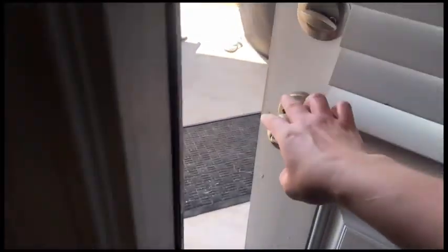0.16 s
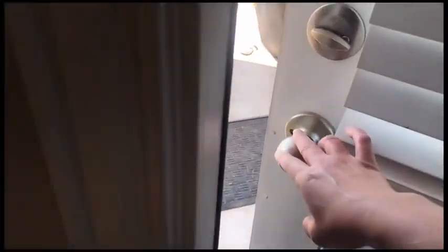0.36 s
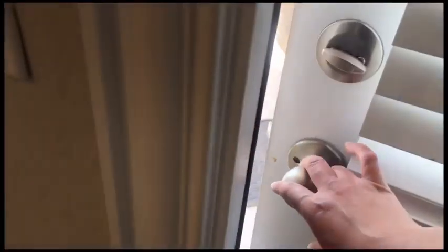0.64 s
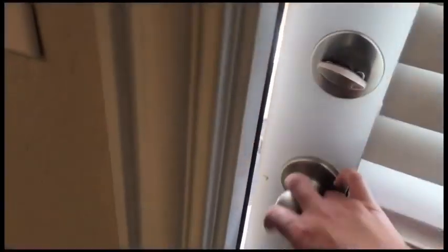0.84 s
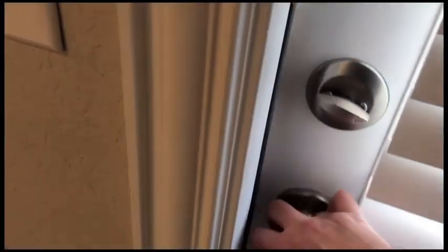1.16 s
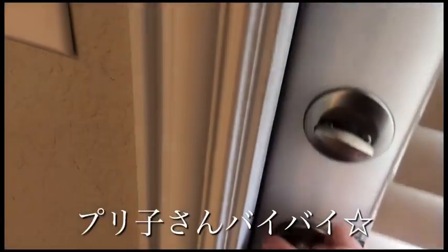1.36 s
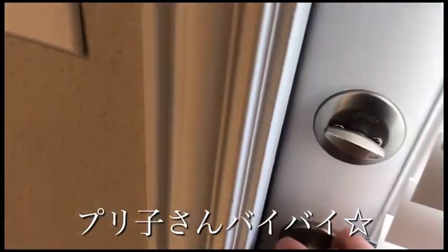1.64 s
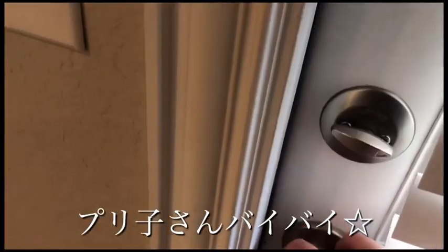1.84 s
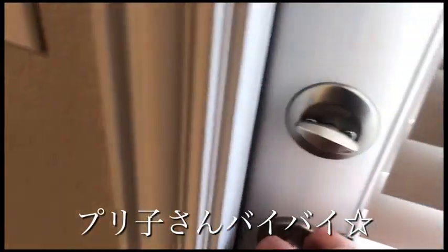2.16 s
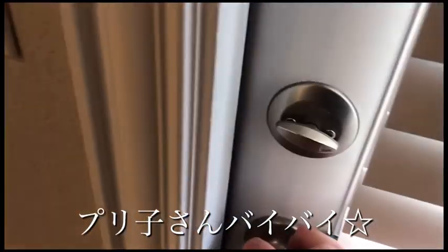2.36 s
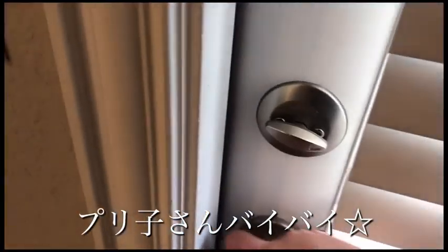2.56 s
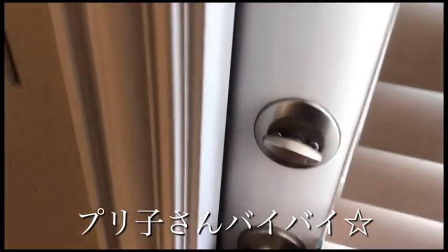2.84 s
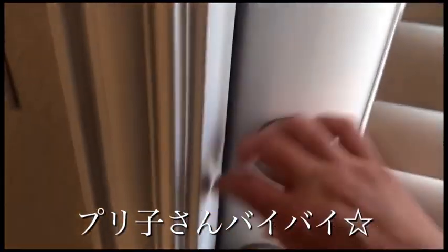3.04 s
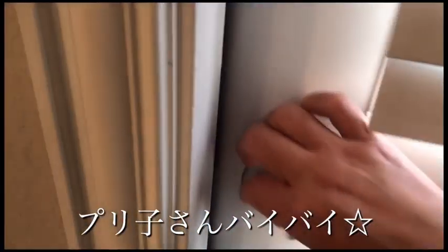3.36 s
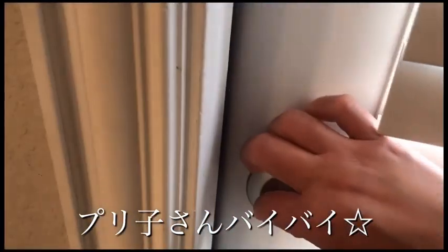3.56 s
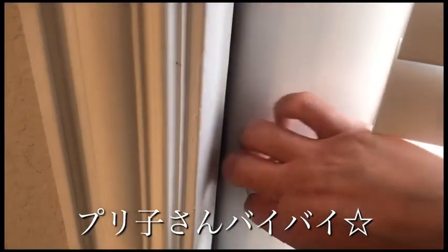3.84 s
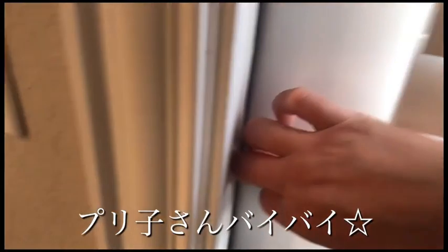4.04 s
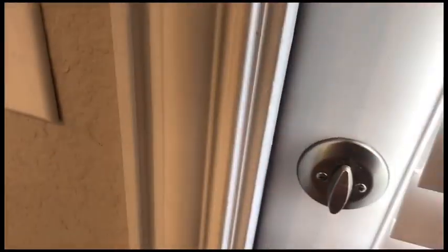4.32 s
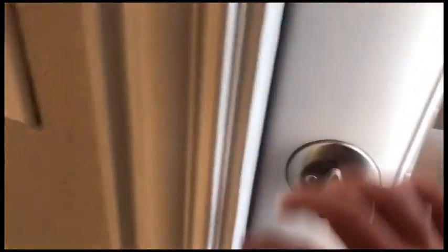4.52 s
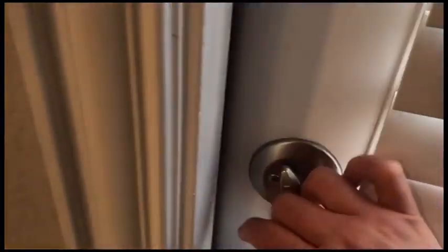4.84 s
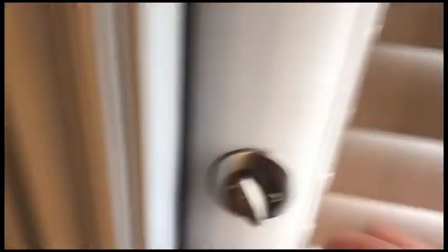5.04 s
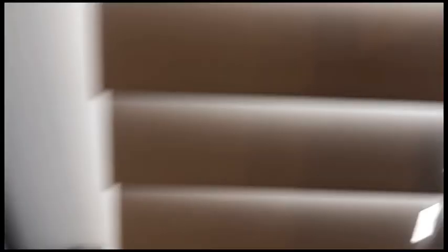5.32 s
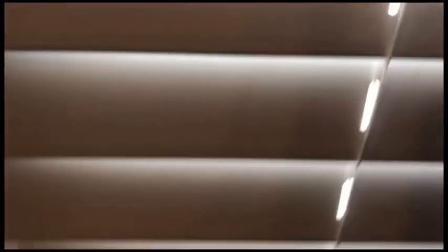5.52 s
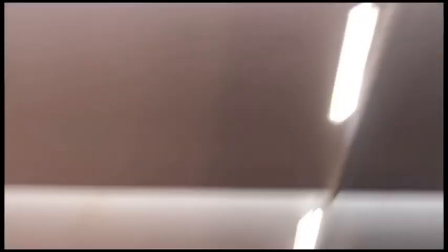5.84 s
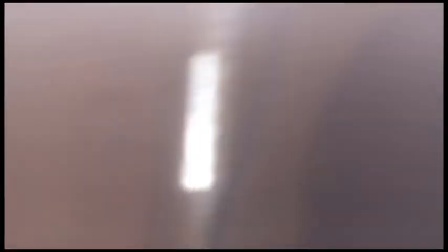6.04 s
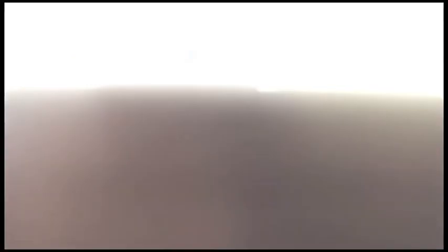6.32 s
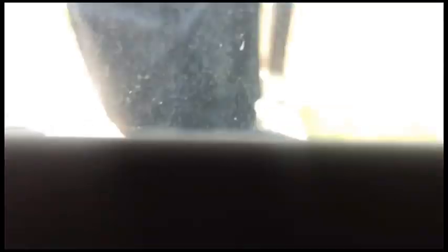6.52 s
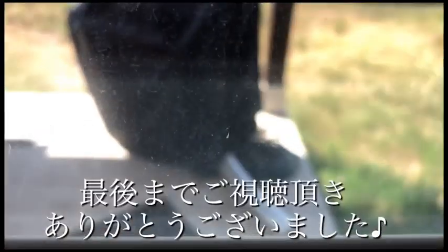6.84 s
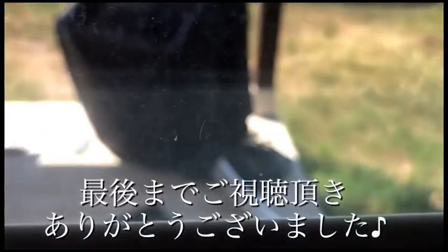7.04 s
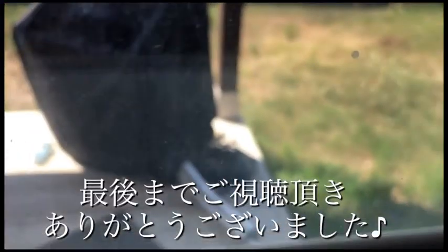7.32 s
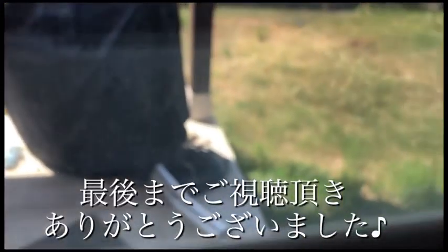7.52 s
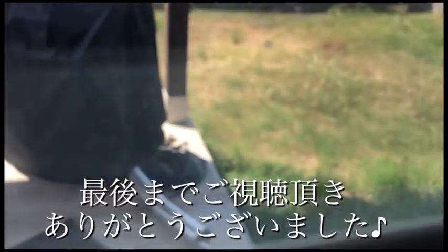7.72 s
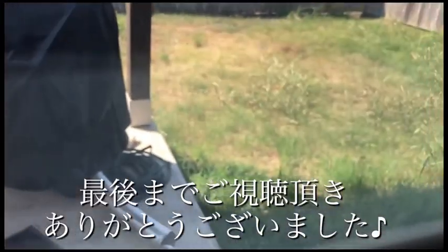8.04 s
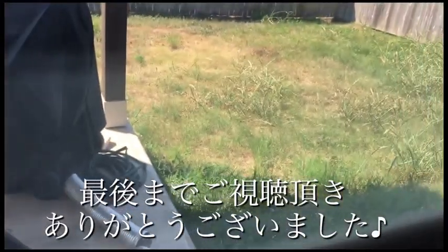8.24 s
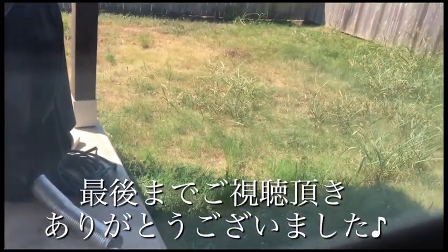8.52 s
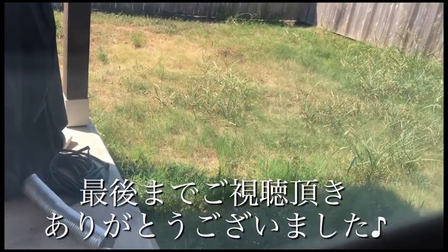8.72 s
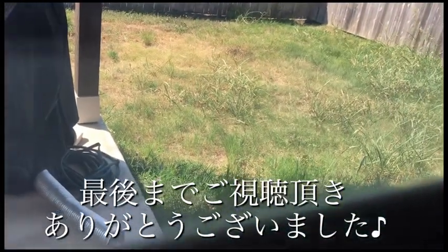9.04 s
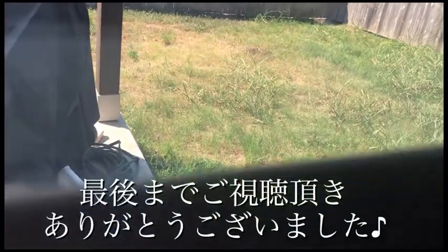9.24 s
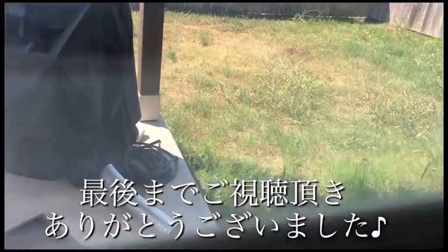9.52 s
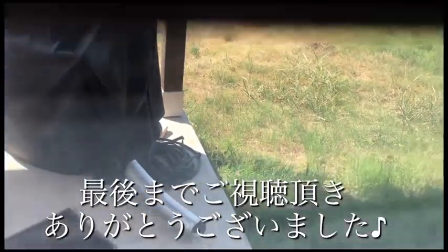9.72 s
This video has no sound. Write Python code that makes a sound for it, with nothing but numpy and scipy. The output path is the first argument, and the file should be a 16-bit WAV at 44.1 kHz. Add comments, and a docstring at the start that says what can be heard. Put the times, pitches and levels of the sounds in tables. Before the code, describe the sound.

Close, hand-held pickup of a door being closed and locked indoors. Skin rubs softly on a plastic case throughout, over a quiet airy rumble. Metal knocks lead to a solid door thump and latch crack, then crisp knob clicks, fumbling and a bright, hard bolt snap, all echoing briefly. Next come hollow plastic taps, a quick patter, a tiny squeak and woody slat flicks, fading into near quiet.

```python
"""A hard-walled house hall: a door is pushed shut, its knob springs back, it is pressed home, the deadbolt is thrown.
A hand-held phone then pushes through the window blind and bumps the glass: slats patter, fingers rub its case.
Metal contacts are noise bursts plus decaying modes; thuds, taps and flicks are damped resonances.
Rubbing is coloured noise, the house is coloured noise and wavering sines; the hall echoes all knocks and taps."""
import sys
import numpy as np
from scipy import signal
from scipy.fft import rfft, irfft
from scipy.io import wavfile
from scipy.ndimage import uniform_filter1d, map_coordinates

SR = 44100
rng = np.random.default_rng(int(sys.argv[2]) if len(sys.argv) > 2 else 0)


def transcribe(signal):
    """Save signal, clipped to [-1, 1], as a 16-bit WAV file at the path in sys.argv[1]."""
    frames = np.atleast_2d(signal).T
    limited = np.clip(frames, -1, 1)
    pcm = np.round(limited * 32767).astype(np.int16)
    wavfile.write(sys.argv[1], SR, pcm)


N = 435708
TIME_S = np.arange(N) / SR
BLOW_S = TIME_S[:8192]  # time axis of one blow


def amp(db):
    """Decibels to gain."""
    return np.exp(np.asarray(db) * (np.log(10) / 20))


def unit(x):
    """Scale to rms 1."""
    return x / np.sqrt(np.mean(x ** 2))


def sized(x):
    """Scale a blow to the energy of 10 ms at rms 1."""
    return x / np.sqrt(np.sum(x ** 2) / (SR / 100))


def read(points, hz):
    """Look up (Hz, value) points on a log-frequency axis."""
    point_hz, value = np.transpose(points)
    return np.interp(np.log(np.maximum(hz, 1)), np.log(point_hz), value)


def colour(x, points, size=4096):
    """Minimum-phase filter with the given (Hz, dB) response, by folding the cepstrum."""
    gain = amp(read(points, np.fft.rfftfreq(size, 1 / SR)))
    cepstrum = irfft(np.log(gain))
    cepstrum[1:size // 2] *= 2
    cepstrum[size // 2 + 1:] = 0
    impulse = irfft(np.exp(rfft(cepstrum)))
    return signal.oaconvolve(x, impulse)[:len(x)]


def fade(t_s, t60_s):
    """Exponential decay, 60 dB down at t60."""
    return np.exp(-np.log(1000) * t_s / t60_s)


def burst(t60_s, rise_s=0.0012, lumpy_db=3):
    """A fading crowd of tiny contacts, bunched unevenly."""
    bunches = np.repeat(rng.standard_normal(len(BLOW_S) // 64), 64)
    crowd = rng.standard_normal(len(BLOW_S)) * amp(lumpy_db * bunches)
    return sized(crowd * fade(BLOW_S, t60_s) * (1 - np.exp(-BLOW_S / rise_s)))


def ring(modes, spread_db=3, detune=0.018):
    """Decaying modes; each blow shares its force among them a little differently."""
    hz, db, t60_s = np.array(modes, np.float32).T[:, :, None]
    force, drift, side = rng.standard_normal((3, len(modes), 1)).astype(np.float32)
    t_s = BLOW_S.astype(np.float32)
    swing = np.sin(2 * np.pi * hz * (1 + detune * drift) * t_s) * fade(t_s, t60_s)
    return sized(np.sum(np.sign(side) * amp(db + spread_db * force) * swing, axis=0))


def knock(hz, t60_s, rise_s):
    """One damped resonance that builds up over the contact time."""
    return sized(np.sin(2 * np.pi * hz * BLOW_S) * fade(BLOW_S, t60_s) * (1 - np.exp(-BLOW_S / rise_s)))


def walk(rate_hz):
    """Smooth random course of rms 1, with new targets at the given rate."""
    step = int(SR / rate_hz)
    targets = np.repeat(rng.standard_normal(N // step + 1), step)
    return unit(uniform_filter1d(targets, step)[:N])


def add(track, start_s, sound):
    """Mix a sound into the track at its start time."""
    i = int(start_s * SR)
    track[i:i + len(sound)] += sound[:N - i]


# Spectrum of the air rush. Each row: frequency in Hz, relative level in dB.
AIR_COLOUR = [(25, -23.5), (45, -4.5), (85, -2), (115, -5.5), (240, -5), (340, -5.5), (450, -16.5),
              (800, -21.5), (1200, -29), (3000, -34.5), (8000, -40.5), (16000, -44)]
# Motor hum lines. Each row: frequency in Hz, level in dB, rms wander in Hz.
HUM_LINES = [(89.2, -66, 4.3), (141.8, -62.5, 0.47), (236.5, -68.5, 2.7), (329.7, -66, 4)]
AIR_DB = -56.5  # before the slow swell


def house(swell_db=-0.84):
    """Low rush of ventilation, slowly swelling, with a few wavering motor lines."""
    out = unit(colour(rng.standard_normal(N), AIR_COLOUR)) * amp(AIR_DB + swell_db * walk(3))
    for hz, db, wander_hz in HUM_LINES:
        phase = 2 * np.pi * np.cumsum(hz + wander_hz * walk(13)) / SR
        out += amp(db) * unit(np.sin(phase))
    return out


# Colour of the echo. Each row: frequency in Hz, gain in dB.
HALL_COLOUR = [(40, -5.5), (100, 5.5), (300, 2.5), (500, 5.5), (1500, -2.5), (4500, -4.5), (7000, -5.5),
               (12000, -6), (16000, -10.5)]
# Decay of the echo. Each row: frequency in Hz, t60 in s.
HALL_DECAY = [(60, 1), (200, 0.72), (500, 0.63), (1500, .9), (5000, 0.8), (9000, 0.29), (16000, 0.41)]


def hall(x, build_s=0.0027):
    """Diffuse echo as decaying noise; the high treble dies sooner than the lows."""
    hz, frame_s, cells = signal.stft(rng.standard_normal(SR), SR, nperseg=256)
    decay = fade(frame_s, read(HALL_DECAY, hz)[:, None])
    tail = signal.istft(cells * decay, SR)[1][:SR]
    tail = tail * (1 - np.exp(-TIME_S[:SR] / build_s))
    tail = tail / np.sqrt(np.sum(tail ** 2))
    return signal.fftconvolve(x, colour(tail, HALL_COLOUR))[:N]


def cupped(x, lag_s=.00022, drift=.25, echo_db=-7):
    """The hand mirrors the sound from a changing distance, so its colour shifts."""
    late = np.arange(N) - SR * lag_s * np.exp(drift * walk(4))  # in samples
    return unit(x + amp(echo_db) * map_coordinates(x, [late], order=3, mode="nearest"))


# Colours of the hollow case murmur, the skin rub and the skin hiss.
# Each row: frequency in Hz, relative level in dB.
CASE_RUB_COLOUR = [(200, -21), (500, -7), (1100, -9.5), (1500, -0.5), (1750, -8.5), (2100, -15),
                   (4000, -18), (16000, -54.5)]
SKIN_RUB_COLOUR = [(500, -24.5), (2200, 0), (3500, -1.5), (5700, -1), (9000, -4.5), (16000, -16)]
SKIN_HISS_COLOUR = [(3000, -39), (8000, -12), (11000, -6), (14500, -0.5), (16000, -1.5)]
# How hard the hand works on the case. Each row: time in s, murmur level in dB.
HOLD_LEVELS = [(0, -66), (.27, -75), (.33, -74), (.7, -57), (1.3, -54), (1.85, -58.5), (2.15, -69.5),
               (2.55, -61.5), (3.0, -68), (3.35, -61), (4.0, -68.5), (4.6, -65.5), (4.85, -57),
               (5.25, -63.5), (5.7, -54.5), (6.2, -68), (6.55, -63), (7.07, -67.5), (7.25, -60.5),
               (8.0, -72.5), (8.3, -66), (8.6, -87.5), (9.88, -68.5)]
# Skin sliding over the phone. Each row: start in s, end in s, stroke level in dB.
SKIN_STROKES = [(0.295, 0.429, -59), (0.465, 0.557, -55), (1.113, 1.197, -67), (1.31, 1.47, -66),
                (3.11, 3.6, -69), (3.266, 3.347, -64), (3.745, 4.03, -71.5), (5.444, 5.914, -65),
                (5.78, 5.82, -61), (6.303, 6.357, -58), (6.482, 6.53, -64.5), (6.586, 6.673, -61.5),
                (6.73, 6.886, -67), (7.157, 7.962, -70.5), (7.797, 7.83, -64.5)]
BRISK_DB, HISS_GROWTH_DB_PER_DB = -63, .35  # hiss share grows with stroke level, neutral at BRISK_DB


def grip(case_db=-5, rub_db=0, hiss_db=1.5, hold_rub_db=-8, hold_hiss_db=-11,
         grain_db=1.5, flutter_db=2, edge_s=0.022):
    """Skin drags over the case in tiny slips: a hollow murmur while it holds, a fine hiss when it slides."""
    slips = amp(grain_db * walk(700) + flutter_db * walk(45))
    case = unit(colour(slips * rng.standard_normal(N), CASE_RUB_COLOUR))
    rub = cupped(unit(colour(slips * rng.standard_normal(N), SKIN_RUB_COLOUR)))
    hiss = unit(colour(slips * rng.standard_normal(N), SKIN_HISS_COLOUR))
    hold = amp(np.interp(TIME_S, *np.transpose(HOLD_LEVELS)))
    out = hold * (case + amp(hold_rub_db) * rub + amp(hold_hiss_db) * hiss)
    for start_s, end_s, db in SKIN_STROKES:
        span = slice(int((start_s - edge_s) * SR), int((end_s + edge_s) * SR))
        # each stroke gathers speed, glides and stops
        inside_s = np.minimum(TIME_S[span] - start_s, end_s - TIME_S[span])
        speed = np.clip(.5 + inside_s / (2 * edge_s), 0, 1)
        bright = amp(hiss_db + HISS_GROWTH_DB_PER_DB * (db - BRISK_DB))
        stroke = amp(case_db) * case[span] + amp(rub_db) * rub[span] + bright * hiss[span]
        out[span] += amp(db) * speed * stroke
    return out


# Slat squeaking along the phone's edge.
# One row: centre in s, level in dB, pitch in Hz, bandwidth in Hz, time to fall to 1/e in s.
SLAT_SQUEAK = (5.803, -49, 4950, 300, .014)


def squeak():
    """Plastic sliding on plastic: a brief rough whistle, noise through a narrow resonance."""
    centre_s, db, hz, width_hz, length_s = SLAT_SQUEAK
    b, a = signal.iirpeak(hz, hz / width_hz, fs=SR)
    whistle = unit(signal.lfilter(b, a, rng.standard_normal(N)))
    return amp(db) * whistle * np.exp(-((TIME_S - centre_s) / length_s) ** 2)


# Slats flicked by the phone. Each row: start in s, level in dB.
SLAT_FLICKS = [(5.978, -44.5), (6.054, -42), (6.376, -41), (6.940, -52.5), (6.969, -47), (7.657, -53.5)]
# Slat resonances, the lowest lasting longest. Each row: frequency in Hz, relative level in dB, t60 in s.
SLAT_RING = [(379.6, -13, .3), (620, -5, 0.11), (703, -5.5, 0.13), (810, -1, 0.08), (920, -2.5, .035)]
# Phone case resonances, also for taps. Each row: frequency in Hz, relative level in dB, t60 in s.
CASE_RING = [(1038, 1, 0.036), (1453, 0, .075), (1666, 0, 0.057), (3500, -17.5, 0.037)]
# Click colour, also for taps. Each row: frequency in Hz, relative level in dB.
CLICK_COLOUR = [(300, -9), (1500, 8), (2600, -8), (3800, -1.5), (5200, -10.5), (6600, -7.5), (9000, -17.5),
                (16000, -18)]


def slats(click_db=-9, click_t60_s=0.025, case_db=-7, slat_db=-2):
    """A flicked slat clicks on the case and gives a short woody note."""
    out = np.zeros(N)
    for start_s, db in SLAT_FLICKS:
        click = sized(colour(burst(click_t60_s), CLICK_COLOUR, size=512))
        note = amp(slat_db) * ring(SLAT_RING, detune=.04) + amp(case_db) * ring(CASE_RING)
        add(out, start_s, amp(db) * (note + amp(click_db) * click))
    return out


# Stick-slip runs against the case, steady then dying away.
# Each row: start in s, hold in s, slip level in dB before decay and scatter.
SLIP_RUNS = [(0.319, 0.0076, -47.5), (0.766, 0.088, -48.5), (5.6, 0.043, -30.5)]
SLIPS_PER_S, SLIPS_PER_RUN = 110, 24
PATTER_T60_S, SLIP_CLICK_DB = .17, -13.5


def patter(case_hz=1450, jitter=.18, scatter_db=2, detune=.06):
    """Slips at a nearly even rate as (s, dB, pitch Hz, click dB); they weaken once the hold is over."""
    slips = []
    for start_s, hold_s, run_db in SLIP_RUNS:
        for k, (late, force, place) in enumerate(rng.standard_normal((SLIPS_PER_RUN, 3))):
            age_s = (k + jitter * late) / SLIPS_PER_S
            dying_db = 20 * np.log10(fade(max(age_s - hold_s, 0), PATTER_T60_S))
            slip_db = run_db + dying_db + scatter_db * force
            slips.append((start_s + age_s, slip_db, case_hz * np.exp(detune * place), SLIP_CLICK_DB))
    return slips


# Fingers and slats tapping the phone.
# Each row: start in s, note level in dB, case pitch in Hz, click level in dB relative to the note.
PHONE_TAPS = [(.301, -45, 1420, -9), (.313, -41.5, 1440, -21), (.593, -50, 1410, -20),
              (.918, -49, 1390, -11.5), (3.232, -40, 1560, -14), (4.763, -44, 1820, -8),
              (4.777, -35, 1330, -8), (4.8236, -40.5, 1570, -30), (4.9021, -43.5, 2650, -21),
              (4.905, -38, 1870, -16), (4.97, -39.5, 1390, -11), (5.453, -36.5, 1530, -7),
              (5.527, -37, 1580, -5), (5.536, -36, 1520, -3.5), (5.555, -35.5, 1476, -24),
              (5.576, -28, 1466, -2), (5.5845, -27.5, 1440, -8.5), (6.595, -48.5, 866, 2.5),
              (6.86, -53, 1500, -7), (7.147, -55.5, 1490, -17), (9.846, -44, 1624, -13)]
# Grit around a tap's pitch. Each row: multiple of the pitch, relative level in dB.
GRIT_COLOUR = [(.2, -19), (.45, -7), (.7, -0.5), (1.25, -1), (1.75, -16.5), (6, -34.5)]
TAP_T60_S = 0.029


def taps(rise_s=0.00055, case_db=-6, grit_db=-3, click_share=0.72):
    """A light click, then a short hollow note in the phone's case."""
    out = np.zeros(N)
    for start_s, db, hz, click_db in PHONE_TAPS + patter():
        grit_points = [(hz * ratio, level_db) for ratio, level_db in GRIT_COLOUR]
        grit = sized(colour(burst(TAP_T60_S), grit_points, size=512))
        note = knock(hz, TAP_T60_S, rise_s) + amp(case_db) * ring(CASE_RING) + amp(grit_db) * grit
        click = sized(colour(burst(click_share * TAP_T60_S, rise_s=.00015), CLICK_COLOUR, size=512))
        add(out, start_s, amp(db) * (sized(note) + amp(click_db) * click))
    return out


# Dull blows on the door leaf; the last two are the phone bumping the window glass.
# Each row: start in s, level in dB, main pitch in Hz.
DULL_BLOWS = [(.785, -44, 125), (.84, -44.5, 110), (.90, -38, 133), (1.328, -29, 219), (1.432, -28.5, 720),
              (1.434, -21.5, 228), (1.495, -39, 170.1), (2.366, -40.5, 326), (2.756, -38.5, 395),
              (3.610, -38, 680), (4.159, -27.5, 700), (4.169, -33, 330), (4.181, -32.5, 95),
              (5.619, -42.5, 124), (6.595, -46.5, 203)]
# Panel resonances, also for the lock. Each row: frequency in Hz, relative level in dB, t60 in s.
PANEL_RING = [(190, -1.5, 0.16), (246.5, -11, 0.041), (326, 4, .07), (440, -1, 0.053), (532, -1, 0.061),
              (754.7, 2, 0.027), (1005, -4.5, 0.015)]
THUD_CYCLES, RUMBLE_DB, RUMBLE_T60_S = 5.7, -6, 0.24  # thud is 60 dB down after THUD_CYCLES


def thuds(rise_s=0.003, panel_db=-13):
    """Door leaf, or at the end the window glass, is struck: a damped low note, panel ring and rumble."""
    out = np.zeros(N)
    rumble_points = [(25, -26.5), (45, -14), (90, 0), (220, -5.5), (400, -13.5), (1200, -45)]  # Hz, dB
    for start_s, db, hz in DULL_BLOWS:
        rumble = sized(colour(burst(RUMBLE_T60_S, rise_s=0.011), rumble_points))
        thud = knock(hz, THUD_CYCLES / hz, rise_s)
        add(out, start_s, amp(db) * (thud + amp(panel_db) * ring(PANEL_RING) + amp(RUMBLE_DB) * rumble))
    return out


SWAY_S, SWAY_DB, SWAY_RISE_S, SWAY_T60_S = 1.505, -41, .022, .85


def door_sway():
    """The shut leaf sways on its seal: low noise that swells quickly and dies slowly."""
    sway_points = [(22, -19.5), (40, 1.5), (65, -4.5), (110, -20), (300, -44.5), (1000, -84)]  # Hz, dB
    sway = unit(colour(rng.standard_normal(N), sway_points))
    since_s = TIME_S - SWAY_S
    swing = np.exp(np.minimum(since_s, 0) / SWAY_RISE_S) * fade(np.maximum(since_s, 0), SWAY_T60_S)
    return amp(SWAY_DB) * swing * sway


CONTACT_HZ, TREBLE_DB_PER_OCTAVE, HIGHEST_CONTACT_HZ = 4630, 9, 9500


def contact_pitch(treble_db):
    """The brighter the contact, the higher the pitch in Hz it favours."""
    return min(CONTACT_HZ * 2 ** (treble_db / TREBLE_DB_PER_OCTAVE), HIGHEST_CONTACT_HZ)


# Sprung latch or bolt lets go, catches on the way, hits its stop, rebounds dully.
# Each row: release in s, stop in s, then release, catch, stop, rebound and treble in dB, stop pitch in Hz.
BOLT_THROWS = [(1.4513, 1.4701, -31.5, -26.5, -18.5, -30, -2, 4350),
               (2.3386, 2.364, -42.5, -44.5, -27.5, -37, 7, 8600),
               (2.7308, 2.7533, -31, -32.5, -29.5, -30.5, 5, 2680),
               (4.1505, 4.1654, -25, -21, -16.5, -20.5, 0, 10100)]
# Single metal knocks in knob and latch. Each row: start in s, level in dB, treble in dB, chatter t60 in s.
METAL_KNOCKS = [(.040, -45.5, -9.5, .11), (.069, -45, -18, .06), (1.2157, -29, -4.5, .04),
                (1.3151, -41, -7, .016), (1.3234, -43, 9.5, .007), (1.331, -36.5, -14, .02),
                (1.4311, -28.5, -14.5, 0.13), (1.478, -28, -12, .13), (1.596, -34, -23, .11),
                (2.093, -51, -11.5, .04), (2.257, -51.5, -4.5, .045), (2.5994, -40.5, -8, .022),
                (2.795, -44, -20, .05), (3.1414, -49.5, -3.5, .012), (3.303, -40.5, -10.5, .07),
                (3.421, -38, -8.5, .03), (3.504, -47, -10.5, .02), (3.555, -44, -4, .06),
                (3.576, -43, -9, .025), (3.610, -32.5, -18, .04), (4.018, -51, 8.5, .06),
                (4.051, -46.5, 2, .007)]
CATCH_SHARE, CATCH_TREBLE_DB = .33, -4  # share of the travel time; treble relative to the throw's
SLIDE_T60_S, STOP_T60_S = 0.083, 0.033  # parts chatter longer in motion than at the stop
REBOUND_S, REBOUND_TREBLE_DB, REBOUND_T60_S = .0015, -14.5, 0.079


def contacts():
    """Single knocks and the four stages of each throw as (s, dB, treble dB, chatter t60 s, pitch Hz)."""
    knocks, stops = list(METAL_KNOCKS), []
    for release_s, stop_s, release_db, catch_db, stop_db, rebound_db, treble_db, stop_hz in BOLT_THROWS:
        catch_s = release_s + CATCH_SHARE * (stop_s - release_s)
        knocks.append((release_s, release_db, treble_db, SLIDE_T60_S))
        knocks.append((catch_s, catch_db, treble_db + CATCH_TREBLE_DB, SLIDE_T60_S))
        knocks.append((stop_s + REBOUND_S, rebound_db, treble_db + REBOUND_TREBLE_DB, REBOUND_T60_S))
        stops.append((stop_s, stop_db, treble_db, STOP_T60_S, stop_hz))
    return stops + [(s, db, treble_db, t60_s, contact_pitch(treble_db)) for s, db, treble_db, t60_s in knocks]


# Lock part resonances. Each row: frequency in Hz, relative level in dB, t60 in s.
LOCK_RING = [(1120, -2, 0.034), (1237, -4, 0.1), (1702, 1, 0.11), (1890, 0, 0.1), (2480, -8.5, .03),
             (3170, -1.5, 0.13), (4280, -5, .05), (5450, -3, .04), (6540, -4, 0.046), (7450, -7.5, 0.019),
             (8830, -4.5, .03), (10100, -7.5, 0.032), (13000, -2, .03)]
# Colour of metal contact noise. Each row: frequency in Hz, relative level in dB.
STEEL_COLOUR = [(150, -18.5), (600, -4.5), (1200, -0.5), (2000, -3), (4200, -5.5), (6000, -5.5),
                (10000, -10), (12500, -10.5), (14500, -7.5), (16000, -12)]
PANEL_DB, PANEL_DB_PER_TREBLE_DB = -16, -0.56  # brighter contacts shake the panel less


def lock(crack_t60_s=0.0058, chatter_db=-1.0, ring_db=-15, contact_db=6, contact_width=1.6):
    """Contacts crack, loose parts chatter, steel rings, the panel answers; returns near and spread sound."""
    near, spread = np.zeros((2, N))
    for start_s, db, treble_db, t60_s, hz in contacts():
        crack = burst(crack_t60_s, rise_s=0.00016, lumpy_db=-2.5)
        chatter = burst(t60_s, rise_s=0.0024, lumpy_db=1.5)
        contact = sized(colour(crack + amp(chatter_db) * chatter, STEEL_COLOUR, size=512))
        steel = contact + amp(ring_db) * ring(LOCK_RING)
        # treble shelf: harder contacts are brighter
        steel = sized(colour(steel, [(1800, 0.00035), (8000, treble_db)], size=512))
        # near sound favours the struck part's pitch; the hall hears all directions evenly
        beam_points = [(hz / contact_width, 0), (hz, contact_db), (hz * contact_width, 0)]
        beamed = sized(colour(steel, beam_points, size=512))
        panel = amp(PANEL_DB + PANEL_DB_PER_TREBLE_DB * treble_db) * ring(PANEL_RING)
        add(near, start_s, amp(db) * (beamed + panel))
        add(spread, start_s, amp(db) * (steel + panel))
    return near, spread


def scene(lock_wet_db=-10.5, thud_wet_db=-12, tap_wet_db=-15):
    """Lock and thuds send most to the hall, taps and slats less; grip, squeak and house stay dry."""
    metal, spread = lock()
    dull = thuds() + door_sway()
    touch = taps() + slats()
    echo = hall(amp(lock_wet_db) * spread + amp(thud_wet_db) * dull + amp(tap_wet_db) * touch)
    mono = house() + echo + grip() + squeak() + touch + dull + metal
    return np.tile(mono, (2, 1))


TOP_HZ = 16000


def record(dry, ceiling=1.0):
    """One microphone feeds both channels and rounds the hardest peaks; the top is cut steeply."""
    rounded = ceiling * np.tanh(dry / ceiling)
    return signal.sosfilt(signal.ellip(10, .2, 70, TOP_HZ, fs=SR, output="sos"), rounded)


dry = scene()
out = record(dry)
transcribe(out)
```